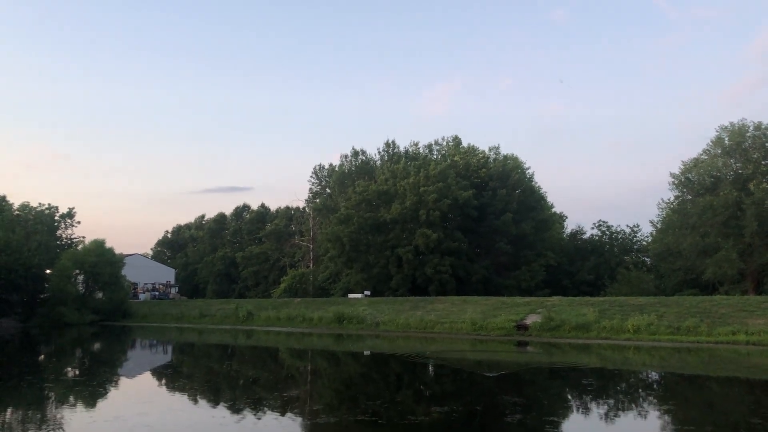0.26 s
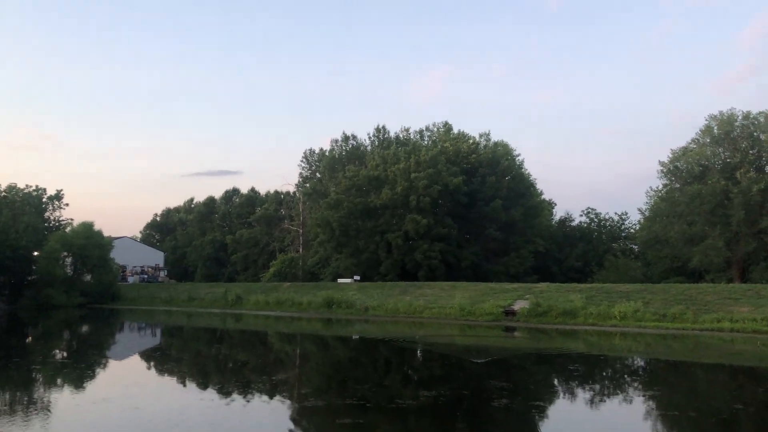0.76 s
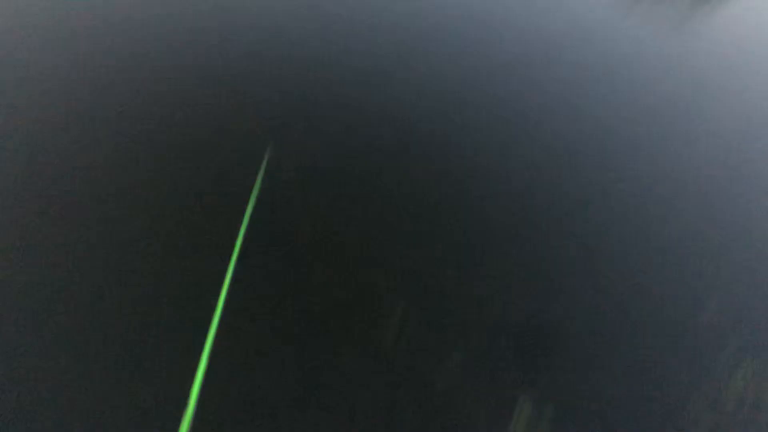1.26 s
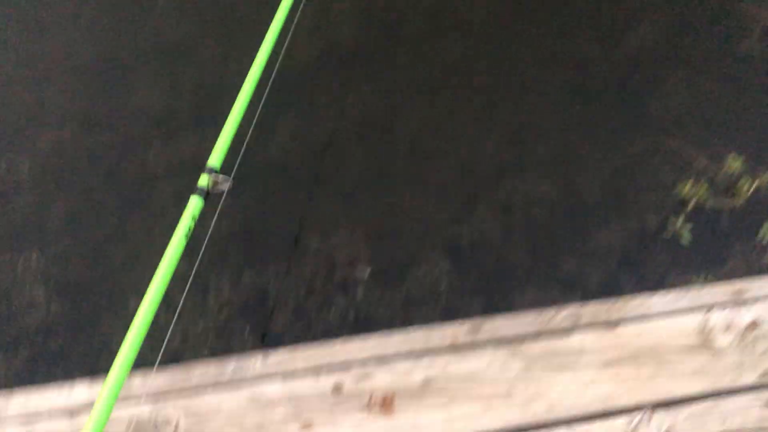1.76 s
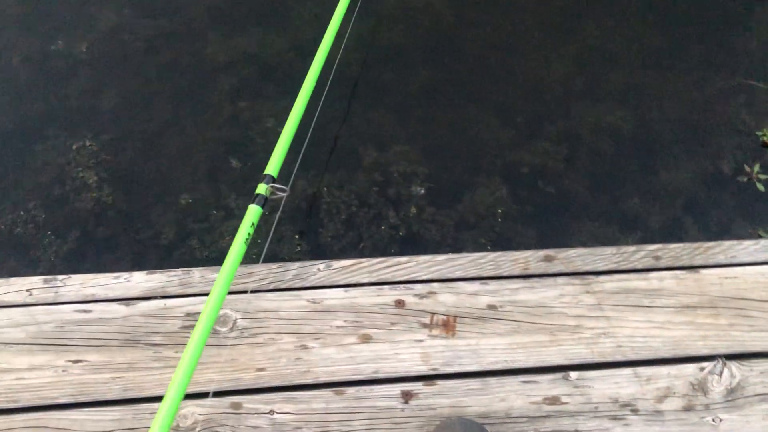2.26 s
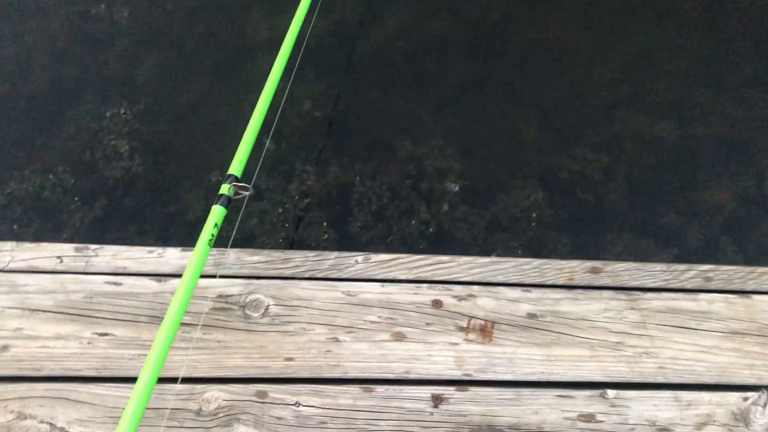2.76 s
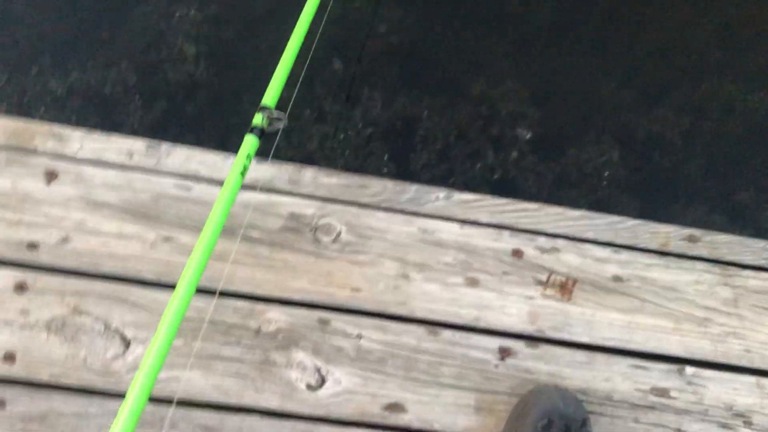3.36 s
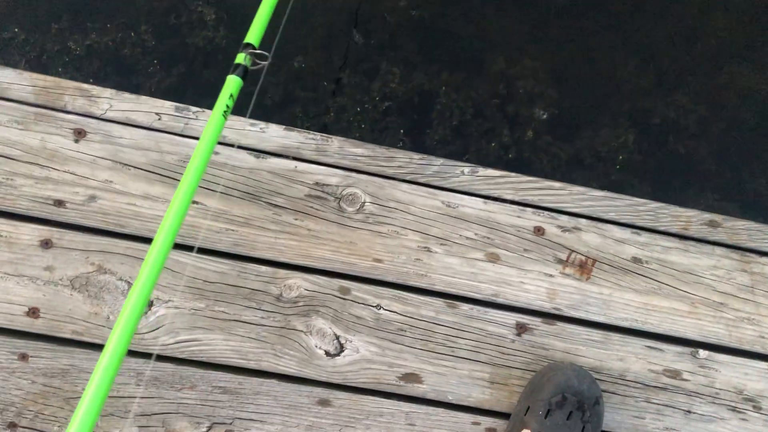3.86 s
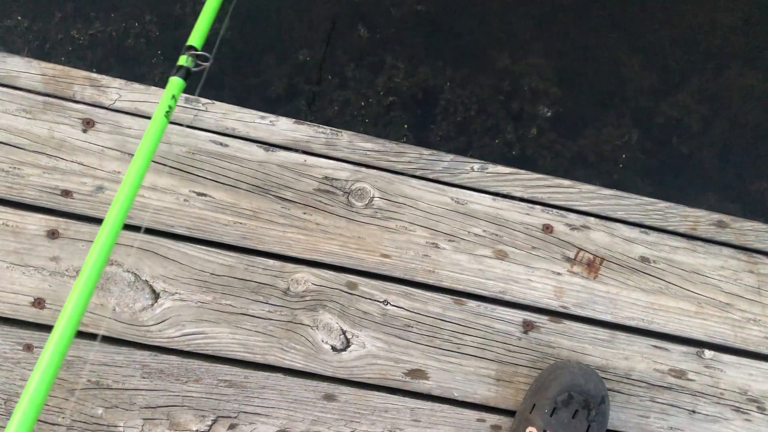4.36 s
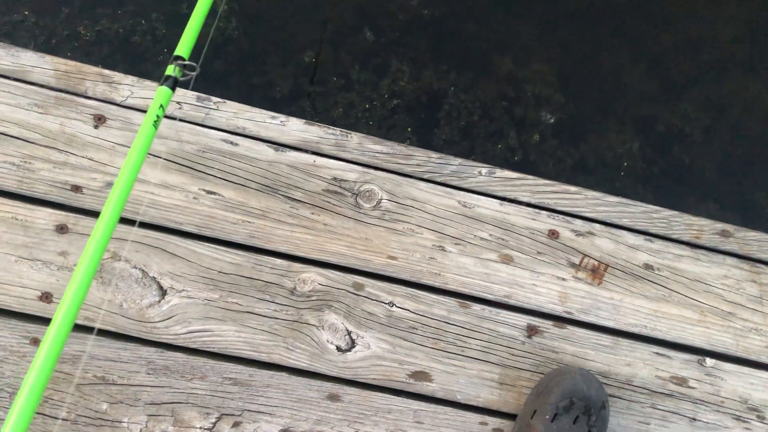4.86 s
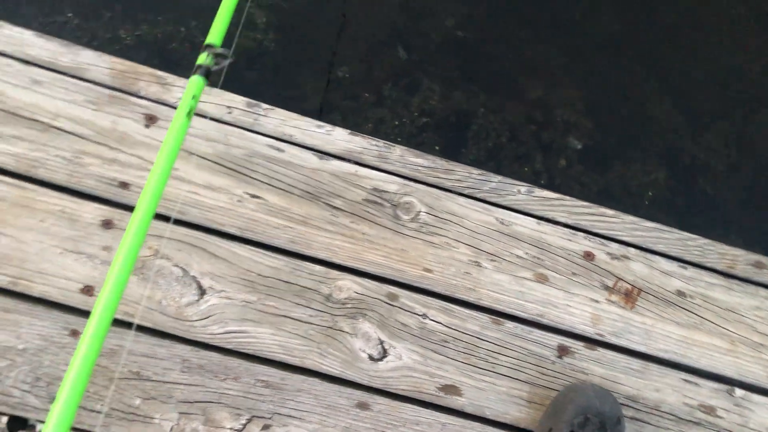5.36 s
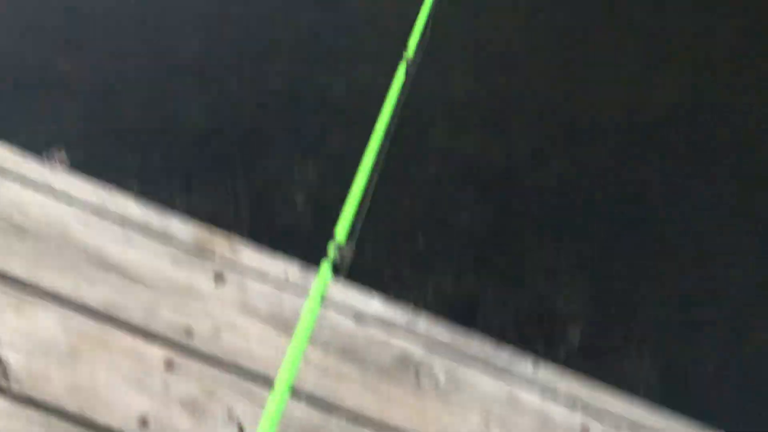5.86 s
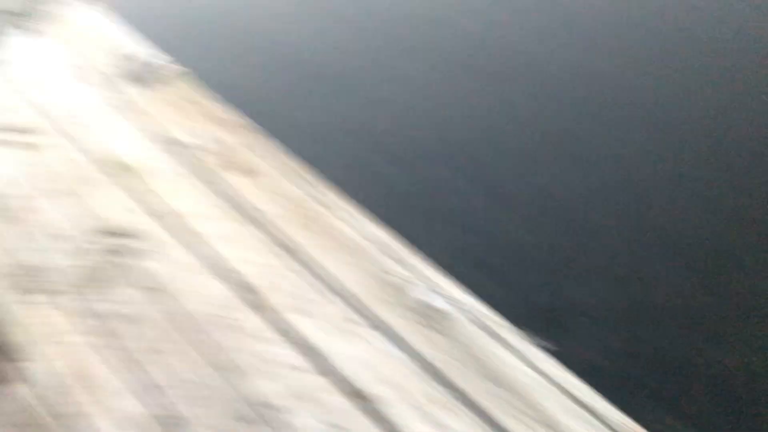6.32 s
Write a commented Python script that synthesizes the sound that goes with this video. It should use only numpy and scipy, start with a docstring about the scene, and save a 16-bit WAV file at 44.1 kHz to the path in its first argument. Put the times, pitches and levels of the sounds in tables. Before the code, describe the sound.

Heard from a wooden dock, several nearby frogs trade short, high, clicking rattles while many more blend together farther off. One sharp click from a fishing rod cuts through early on. The calling then grows quieter and more distant over a soft, low background rumble. At the close a shoe lightly scuffs the boards, with a couple of soft knocks and a slight deep rumble from the microphone being handled.

```python
"""A pond at dusk, with small frogs calling. Each call is a rattle of short pulses that ring a frog's
throat sac near 4 kHz. Near callers stand out over a blurred far chorus and a low distant rumble.
On the wooden dock a piece of tackle snaps once and rings. Later come soft knocks, a faint far-off note
and a shoe scuffing the boards. A deep microphone-handling rumble swells near the end."""
import sys
import numpy as np
from scipy import signal
from scipy.fft import rfft, irfft, next_fast_len
from scipy.io import wavfile
from scipy.ndimage import uniform_filter1d

SR = 44100
rng = np.random.default_rng(int(sys.argv[2]) if len(sys.argv) > 2 else 0)


def dump_mix(stems):
    """Bounce the given channels to the path in sys.argv[1] as a 16-bit WAV at rate SR."""
    frames = np.atleast_2d(stems).T  # one column per channel
    limited = np.clip(frames, -1, 1)  # hard clip at full scale
    pcm = np.round(limited * 32767).astype(np.int16)
    wavfile.write(sys.argv[1], SR, pcm)


N = 290617

# far traffic-like noise: (time [s], rumble [dB], drone [dB], tyre wash [dB])
AIR_LEVELS = [(0.0, -63, -66, -69.5), (0.53, -63.5, -64, -67.5), (1.39, -61.5, -67, -73.5),
              (2.03, -59.5, -67.5, -72), (2.57, -61.5, -68.5, -74.5), (3.01, -60.5, -68.5, -67),
              (3.52, -59, -70.5, -72.5), (4.15, -60.5, -70.5, -71), (4.53, -63, -70.5, -70.5),
              (6.29, -59, -67.5, -69.5), (6.59, -64, -64, -65)]
# the tone colour of each noise: (frequency [Hz], relative level [dB])
RUMBLE_COLOUR = [(15, -57), (30, -28), (50, -7), (80, -2), (120, -0.5), (200, -6), (280, -16), (400, -50.5)]
DRONE_COLOUR = [(150, -22.5), (260, -0.5), (350, 0.5), (500, -3), (680, -5), (900, -40.5)]
WASH_COLOUR = [(550, -3), (750, 5), (850, 5.5), (1000, 3.5), (1150, 4.5), (1300, -3), (1700, -55)]
HISS_COLOUR = [(600, -29.5), (1300, -1.5), (2000, -1.5), (4000, 1.5), (6740, -14), (10000, -21.5),
               (16000, -36)]
HANDLING_COLOUR = [(15, -28.5), (35, -2), (55, 7.5), (80, -2.5), (130, -48)]
SCUFF_COLOUR = [(300, -6), (1000, 7), (2000, -0.5), (4500, 5), (7000, -4), (10000, -16.5), (12000, -34),
                (16000, -50)]
# loudness of the far chorus: (time [s], level [dB])
CHORUS_LEVELS = [(0.0, -49), (0.2, -52), (0.45, -51.5), (1.5, -48.5), (1.63, -53.5), (1.78, -50.5),
                 (1.93, -53.5), (2.09, -50), (2.2, -51.5), (2.6, -56.5), (3.1, -55), (3.6, -56),
                 (5.0, -56.5), (6.05, -57), (6.59, -56.5)]
# head and throat rings that make the click: (multiple of the pitch, level [dB], rise [ms], decay [ms])
CLICK_RINGS = [(1.4, 10, 0.12, 1), (1.948, -3, 0.2, 1), (2.4, -11, 0.16, 0.76)]
# the sac rings longer in a strong call: (call level [dB], first pulse's decay [ms])
SAC_DECAY = [(-36, .8), (-26, 1.55)]
# a ring below the sac's: (pitch [Hz], level [dB], rise [ms], decay [ms], share of the fade)
LOWER_RING = (3021, -16.5, 0.36, 2.5, 0.56)
# each voice's base settings: (pitch [Hz], steady gap [ms], fade [dB per pulse], click against ring [dB],
# pitch spread [Hz], gap spread [ms], gap growth [share per s], fade growth [share per s])
FROG_VOICES = {"high": (4010, 3.9, 1.45, -27, 0, 0, .045, .13), "fast": (3700, 3.2, 1.9, -32, 0, 0, 0, 0),
               "slow": (3710, 5.3, 1.3, -34, 0, 0, 0, 0), "across": (3630, 4.3, 1.5, -34, 90, .8, 0, 0)}
# calls that stand out: (time [s], voice, level [dB], pulses [at most 17 sound], first gap [ms])
CALLS = [(0.0218, "high", -30.5, 14, 4.9), (0.0936, "fast", -29.5, 1.8, 8.2), (0.1364, "fast", -32, 1, 7),
         (0.1437, "fast", -28, 28, 5.6), (0.2515, "slow", -33, 1, 6), (0.2648, "slow", -31.5, 1, 6),
         (0.2767, "slow", -31.5, 5, 6.6), (0.3017, "slow", -30.5, 8, 5), (0.339, "across", -38, 1, 5),
         (0.3485, "high", -33, 1, 5), (0.381, "high", -30, 14, 4.7), (0.4088, "across", -35.5, 7.6, 6.1),
         (0.4497, "fast", -26, 12, 7.5), (0.565, "slow", -44, 2, 5.4), (0.591, "slow", -31.5, 22, 5.7),
         (0.6773, "high", -34.5, 2, 6.2), (0.6848, "across", -34, 10, 4.9),
         (0.7144, "high", -30.5, 12, 4.9), (0.7717, "fast", -26.5, 11, 7.4),
         (0.8522, "across", -39, 10, 4.6), (0.9025, "slow", -31, 11, 8.8), (0.99, "across", -37, 6.4, 5.7),
         (1.0229, "across", -33.5, 10, 5.5), (1.038, "high", -36, 1, 5), (1.0666, "high", -30, 17, 4.5),
         (1.085, "fast", -31, 10, 6), (1.1603, "across", -44, 7.5, 6.1), (1.1855, "across", -41, 6.9, 5.1),
         (1.2163, "slow", -37.5, 7.4, 6.6), (1.3498, "fast", -31.5, 4, 4.9),
         (1.3888, "fast", -27.5, 24, 3.7), (1.3932, "high", -27.5, 7.6, 4.7),
         (1.5163, "slow", -31.5, 9.4, 7.3), (1.6005, "across", -37.5, 6.1, 5),
         (1.6667, "fast", -33, 1.8, 3.4), (1.6912, "high", -31, 1.7, 5.5), (1.6984, "fast", -26.5, 22, 6.8),
         (1.7247, "high", -26.5, 1, 5), (1.7306, "high", -28.5, 13, 4.2), (1.7862, "slow", -36, 1, 4.5),
         (1.809, "slow", -30.5, 9.4, 7.9), (1.9472, "across", -37.5, 5.2, 3), (1.974, "fast", -34, 2, 6.8),
         (2.0079, "fast", -27, 11, 5.1), (2.054, "high", -29, 1, 6), (2.0597, "high", -27.5, 13, 4.4),
         (2.1066, "slow", -33, 1.1, 5), (2.1322, "slow", -32, 9.7, 7.4), (2.2778, "fast", -33.5, 3.3, 3.6),
         (2.3096, "fast", -27, 14, 5), (2.378, "high", -31.5, 1, 5), (2.4071, "high", -28, 1, 6),
         (2.4177, "slow", -33, 1, 6), (2.4212, "high", -28, 1, 6), (2.4275, "high", -30, 18, 4.6),
         (2.4562, "slow", -32.5, 5.1, 6.6), (2.583, "fast", -32.5, 3, 3.4),
         (2.6145, "fast", -27.5, 14, 5.9), (2.7098, "slow", -35.5, 2, 9), (2.7298, "slow", -30, 10, 6),
         (2.7614, "high", -28, 16, 5.7), (2.8904, "fast", -32.5, 2, 5.5), (2.9239, "fast", -27.5, 13, 5.1),
         (3.0123, "high", -30.5, 1, 5), (3.0377, "slow", -30, 2.9, 7.3), (3.0479, "high", -27.5, 12, 6.9),
         (3.2347, "across", -43, 7, 3.5), (3.2989, "across", -37, 2, 8.6), (3.317, "high", -32, 1, 8.1),
         (3.3501, "high", -26.5, 12.4, 5.6), (3.489, "across", -37, 14, 3.4), (3.584, "high", -30, 1, 5),
         (3.621, "high", -26, 9.5, 6.6), (3.6802, "across", -37.5, 18, 7.4),
         (3.87, "across", -36.5, 16, 3.04), (4.0596, "across", -40, 3, 3.8),
         (4.0859, "across", -38.5, 9, 2.8), (4.2311, "across", -39, 3.1, 3.8),
         (4.2553, "across", -36, 10, 4.3), (4.391, "across", -40, 6, 4.4), (4.4205, "across", -38, 2, 4.9),
         (4.5346, "across", -40.5, 6.7, 7.4), (4.6272, "across", -40, 2.7, 9.8),
         (4.693, "across", -42, 2, 9.4), (4.7259, "across", -38, 2.3, 12.6),
         (4.778, "across", -42, 5.6, 4.8), (4.85, "across", -42, 5.4, 3.7),
         (4.891, "across", -38.5, 2, 7.1), (5.0091, "across", -40.5, 22, 12.6),
         (5.1556, "across", -37.5, 12, 14), (5.2862, "across", -39, 8, 9.8),
         (5.4692, "across", -42.5, 5.8, 11.6), (5.4928, "across", -38.5, 7, 7),
         (5.747, "across", -42, 8, 5), (5.966, "across", -40.5, 11, 9.2),
         (6.0678, "across", -41.5, 13, 5.8), (6.24, "across", -40, 12, 3.4),
         (6.4648, "across", -46, 5.7, 4.7)]
# the fast frog's click is duller at first: (until [s], change [dB])
DULL_START = (1.3, -4)
# hits within the snap: (time [s], level [dB], brightness [0-1])
TACKLE_HITS = [(2.0403, -30, .3), (2.0420, -27, .2), (2.0436, -15, .9), (2.0442, -12, .1),
               (2.0461, -16, .8), (2.0470, -24, .4)]
# how the tackle rings: (pitch [Hz], relative level [dB], time to fall 60 dB [s])
TACKLE_RINGS = [(122, -35.5, 0.051), (545, -33.5, 0.023), (817, -27, 0.022), (1180, -17, 0.0092),
                (1700, -13, 0.014), (2010, -2, 0.0029), (2770, -0.5, 0.0052), (4640, -9, 0.0073),
                (5980, -9.5, 0.0089), (9040, -5, 0.00087)]
# soft knocks: (time [s], level [dB], start pitch [Hz], end pitch [Hz], length [ms])
SOFT_KNOCKS = [(3.098, -53, 714, 264, 9), (5.705, -53.5, 650, 294, 8.7), (6.015, -46, 1550, 387, 5.5)]
# a far-off note: (time [s], length [s], pitch [Hz], level [dB])
FAR_NOTE = (5.12, .3, 352, -68)
# rumble from handling the microphone: (time [s], level [dB])
HANDLING_LEVELS = [(0, -96), (5.5, -95), (5.75, -67), (5.95, -77), (6.25, -61), (6.59, -73.5)]
# shoe on the boards: (time [s], length [s], level before the bass cut [dB], bass cut [Hz])
SHOE_SCUFFS = [(5.65, 0.074, -54.5, 2560), (5.76, 0.13, -71, 2600), (6.013, 0.04, -54, 250)]

MAX_PULSES, GAP_SETTLING, TIRING_MS = 17, .35, .2
CHORUS_CALLS_PER_S, CHORUS_HZ, CHORUS_SPREAD_HZ = 80, 3657, 175


def amp(db):
    """Turn decibels into a number to multiply by."""
    return 10 ** (np.asarray(db) / 20)


def rms_one(x):
    """Scale a sound so its average strength (rms) is 1."""
    return x / np.sqrt(np.mean(x ** 2) + 1e-20)


def in_time(rows):
    """Join a table's points with lines: one curve per level column."""
    times, *columns = np.transpose(rows)
    return [np.interp(np.arange(N) / SR, times, column) for column in columns]


def add(out, start, sound):
    """Mix a sound in at a start time in seconds."""
    i = round(start * SR)
    part = out[max(i, 0):max(i + len(sound), 0)]
    part += sound[max(-i, 0):][:len(part)]


def let_through(x, side, hz, order):
    """Keep the "low" or "high" side of hz; a bigger order cuts more sharply."""
    return signal.sosfilt(signal.butter(order, hz, side, fs=SR, output="sos"), x + 1e-18)


def coloured(colour):
    """Steady noise with the given tone colour, at strength 1."""
    size = next_fast_len(N)
    hz, db = np.transpose(colour)
    grid = np.arange(1, size // 2 + 2) * SR / size
    shape = amp(np.interp(np.log(grid), np.log(hz), db))
    return rms_one(irfft(rfft(rng.standard_normal(size)) * shape, size)[:N])


def distant_noise():
    """Rumble, drone and wash each swell on their own over a steady hiss."""
    layers = zip(in_time(AIR_LEVELS), (RUMBLE_COLOUR, DRONE_COLOUR, WASH_COLOUR))
    return sum(amp(db) * coloured(colour) for db, colour in layers) + amp(-67) * coloured(HISS_COLOUR)


def burst(t, rise_ms, decay_ms):
    """Something struck swells fast and dies away more slowly; the peak is 1."""
    shape = (1 - np.exp(-t * 1000 / rise_ms)) ** 2 * np.exp(-t * 1000 / decay_ms)
    return shape / shape.max()


def frog_rattles(calls, low_boost_db=0):
    """Each pulse is a sac ring, a lower ring and a click; over a call the sac's ring fades most."""
    out, k, t = np.zeros(N), np.arange(MAX_PULSES), np.arange(400) / SR
    chance = rng.standard_normal((len(calls), MAX_PULSES, 4))
    low_hz, low_db, low_rise_ms, low_decay_ms, low_share = LOWER_RING
    low_shape = burst(t, low_rise_ms, low_decay_ms)
    # the emptying sac rings shorter and a little higher with every pulse
    shorter = 1 + .026 * k
    rising = 1 + .06 * (np.tanh(k / 3) - .35)
    click_shapes = [(ratio, amp(db) * burst(t, rise, decay)) for ratio, db, rise, decay in CLICK_RINGS]
    for (start, level_db, hz, pulses, first_ms, steady_ms, fade_db, click_db), luck in zip(calls, chance):
        # the gaps settle to a steady pace, then stretch as the frog tires
        gaps_ms = steady_ms + (first_ms - steady_ms) * GAP_SETTLING ** k + TIRING_MS * np.maximum(k - 5, 0)
        starts = start + (np.cumsum(gaps_ms) - gaps_ms) / 1000
        decay_ms = np.interp(level_db, *np.transpose(SAC_DECAY))
        faded_db = 4 * fade_db * (k / 4) ** 1.3
        for j in range(int(np.clip(round(pulses), 1, MAX_PULSES))):
            pitch_luck, sac_luck, click_luck, low_luck = luck[j]
            phase = 2 * np.pi * hz * rising[j] * (1 + .011 * pitch_luck) * t
            sac = burst(t, rise_ms=.35, decay_ms=decay_ms / shorter[j]) * np.sin(phase)
            low = low_shape * np.sin(2 * np.pi * low_hz * (1 + .05 * low_luck) * t)
            click = sum(shape * np.sin(ratio * phase / rising[j]) for ratio, shape in click_shapes)
            pulse = amp(.74 * sac_luck - faded_db[j]) * sac
            pulse += amp(low_db + low_boost_db - low_share * fade_db * j) * low
            pulse += amp(click_db - .67 * fade_db * j + 2 * click_luck) * click
            add(out, starts[j], amp(level_db) * pulse)
    out = let_through(out, "high", hz=2650, order=6)  # a small body gives off no bass
    return let_through(out, "low", hz=10500, order=4)  # the trip over the water dulls the top


def bank_echo(x, fall_60_db_s=.4):
    """Banks and trees scatter the sound back as a dull, fading echo."""
    t = np.arange(round(.5 * SR)) / SR
    tail = rng.standard_normal(len(t)) * amp(-60 * t / fall_60_db_s) * np.clip(t / .0008, 0, 1)
    tail = signal.lfilter([.4], [1, -.6], tail)  # soften the treble
    return signal.fftconvolve(x, tail / np.sqrt(np.sum(tail ** 2)))[:N]


def far_chorus():
    """Many weak frogs call at random, blurred by echoes and evened out to follow a loudness curve."""
    count = round(CHORUS_CALLS_PER_S * N / SR)
    when, length, first_gap, steady_gap, fade = rng.random((count, 5)).T
    level, pitch = rng.standard_normal((count, 2)).T
    calls = np.c_[when * N / SR - .05, -45 + 2.5 * level, CHORUS_HZ + CHORUS_SPREAD_HZ * pitch,
                  1 + 9 * length, 5 + 4 * first_gap, 3.2 + 2.5 * steady_gap, .5 + 2.5 * fade,
                  np.full(count, -27)]  # the last column is the click level
    crowd = frog_rattles(calls, low_boost_db=2)
    crowd = crowd + amp(-6) * bank_echo(crowd)
    strength = np.sqrt(uniform_filter1d(crowd ** 2, size=SR // 8) + 1e-12)
    return amp(in_time(CHORUS_LEVELS)[0]) * crowd / strength


def clear_frogs():
    """Three near frogs and some across the water rattle, each in its own voice."""
    calls = []
    for start, voice, level_db, pulses, first_ms in CALLS:
        hz, steady_ms, fade_db, click_db, spread_hz, spread_ms, slowing, fading = FROG_VOICES[voice]
        hz += spread_hz * rng.standard_normal()
        steady_ms = max(steady_ms * (1 + slowing * start) + spread_ms * rng.standard_normal(), 3)
        fade_db *= (1 + fading * start) * (12 / max(pulses, 1)) ** .5  # short calls fade faster
        if voice == "fast" and start < DULL_START[0]:
            click_db += DULL_START[1]
        if pulses < 3.5:  # a brief tick is lower and duller
            hz -= 50
            click_db -= 2.5
        calls.append((start, level_db, hz, pulses, first_ms, steady_ms, fade_db, click_db))
    return frog_rattles(calls)


def tackle_snap():
    """A few hits within milliseconds ring the tackle; hard ones bring out its high notes."""
    out, t = np.zeros(N), np.arange(6000) / SR
    for start, hit_db, brightness in TACKLE_HITS:
        for k, (hz, db, fall_s) in enumerate(TACKLE_RINGS):
            tilt_db = 12 * (brightness - .5) * np.log2(max(hz, 800) / 3500)
            ring = (-1) ** k * amp(-60 * t / fall_s) * np.sin(2 * np.pi * hz * t)
            add(out, start, amp(hit_db + db + tilt_db) * ring)
    bank_tail = amp(-42 - 60 * t / .05) * np.diff(rng.standard_normal(len(t) + 1))  # a short, fading echo off the banks
    add(out, TACKLE_HITS[0][0], bank_tail)
    return let_through(out, "low", hz=11000, order=4)


def soft_knocks():
    """Each knock is a very short tone that slides down."""
    out = np.zeros(N)
    for start, db, start_hz, end_hz, ms in SOFT_KNOCKS:
        n = round(ms * SR / 1000)
        phase = 2 * np.pi * np.cumsum(np.geomspace(start_hz, end_hz, n)) / SR
        add(out, start, amp(db) * signal.windows.tukey(n, .5) * np.sin(phase))
    return out


def far_note():
    """A faint, low, steady note fades in and out."""
    start, length, hz, db = FAR_NOTE
    out, t = np.zeros(N), np.arange(round(length * SR)) / SR
    add(out, start, amp(db) * signal.windows.tukey(len(t), .4) * np.sin(2 * np.pi * hz * t))
    return out


def handling_rumble():
    """Handling the microphone makes a deep rumble that swells near the end."""
    return amp(in_time(HANDLING_LEVELS)[0]) * coloured(HANDLING_COLOUR)


def shoe_scuffs():
    """A shoe rubs the boards: short patches of noise with a gritty flicker."""
    out, grit = np.zeros(N), coloured(SCUFF_COLOUR)
    flicker_db = 2.7 * rms_one(uniform_filter1d(rng.standard_normal(N), size=90))
    grit *= amp(flicker_db)
    for start, length, db, cut_hz in SHOE_SCUFFS:
        i, n = round(start * SR), round(length * SR)
        rub = let_through(grit[i:i + n], "high", cut_hz, order=2)
        add(out, start, amp(db) * signal.windows.tukey(n, .3) * rub)
    return out


def scene():
    """Mix the pond, the dock and the handling rumble into one channel."""
    frogs = clear_frogs()
    handling = handling_rumble()
    pond = frogs + amp(-12) * bank_echo(frogs) + far_chorus() + distant_noise() + far_note()
    dock = tackle_snap() + soft_knocks() + shoe_scuffs()
    return (pond + dock + handling)[None]


def record(dry, cutoff_hz=16500):
    """Cut away the very highest treble."""
    return signal.sosfilt(signal.cheby2(24, 60, cutoff_hz, fs=SR, output="sos"), dry)


dry = scene()
out = record(dry)
dump_mix(out)
```